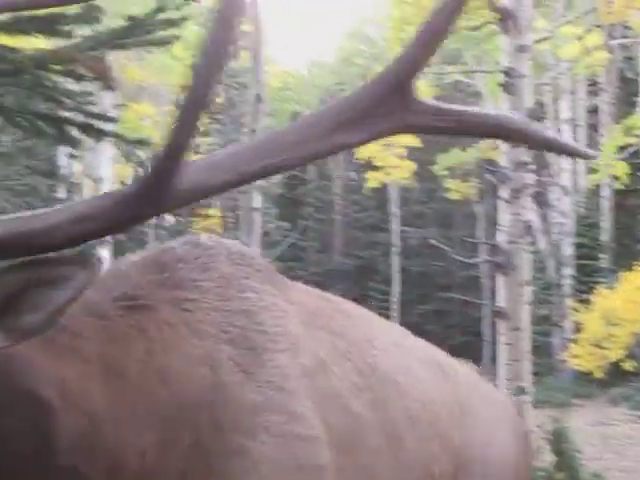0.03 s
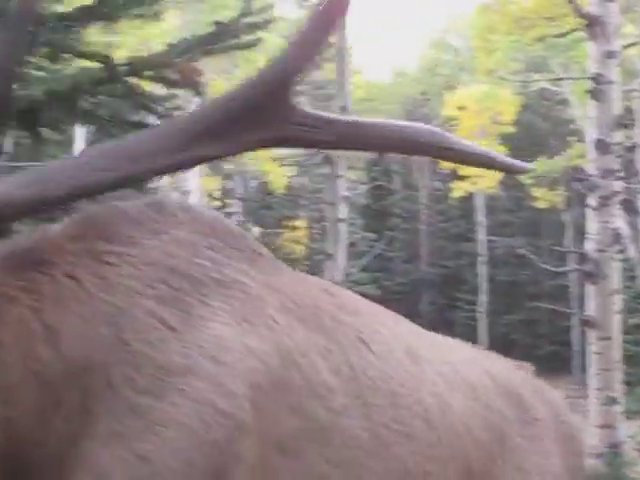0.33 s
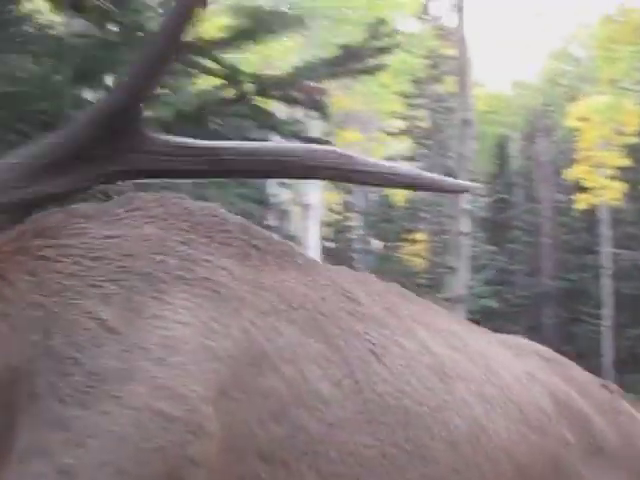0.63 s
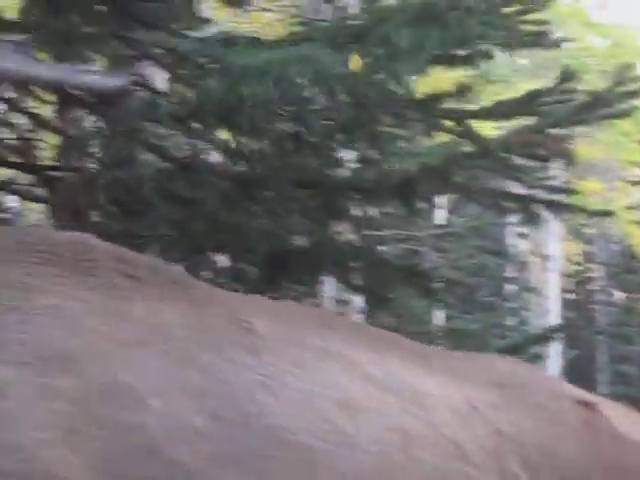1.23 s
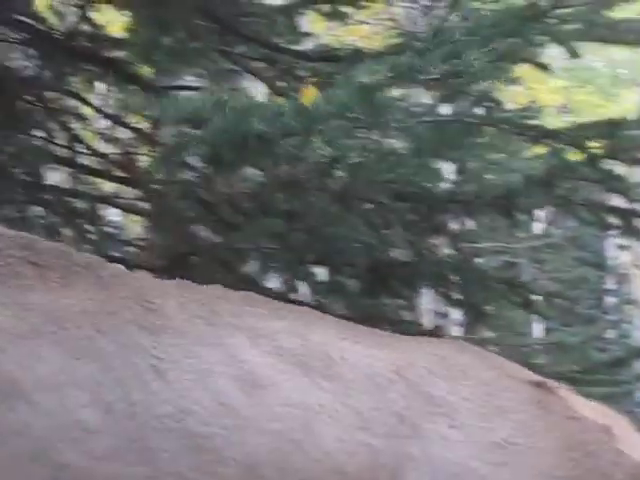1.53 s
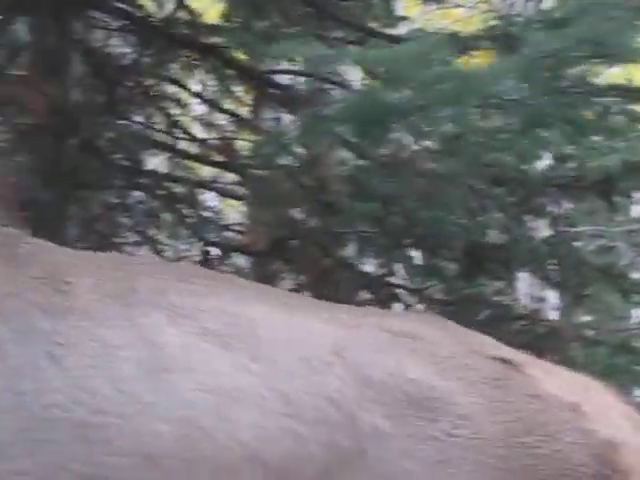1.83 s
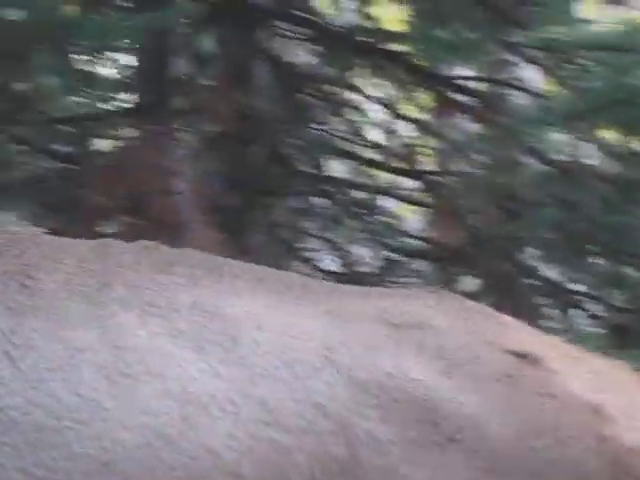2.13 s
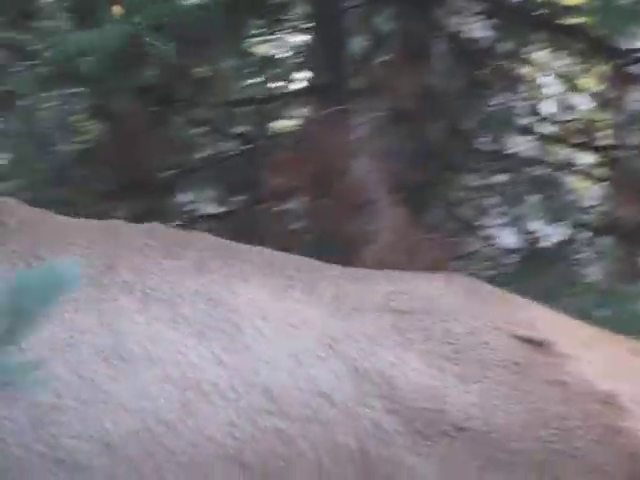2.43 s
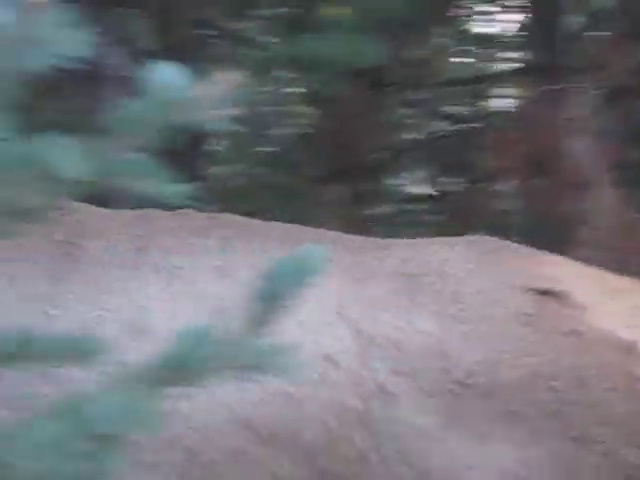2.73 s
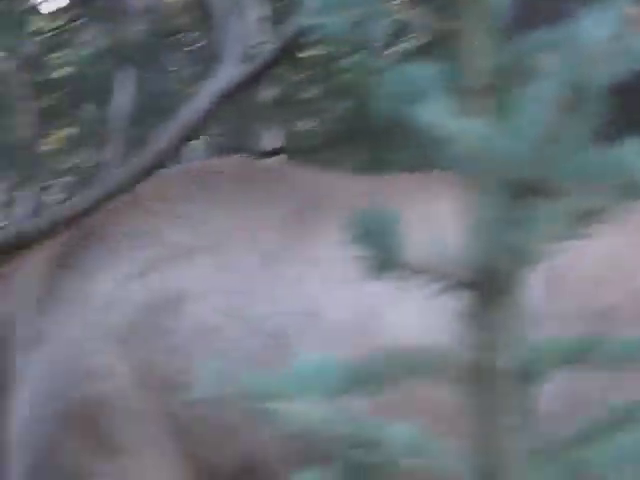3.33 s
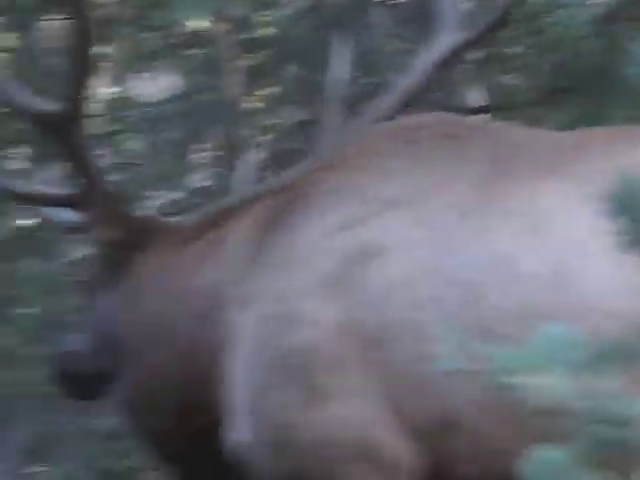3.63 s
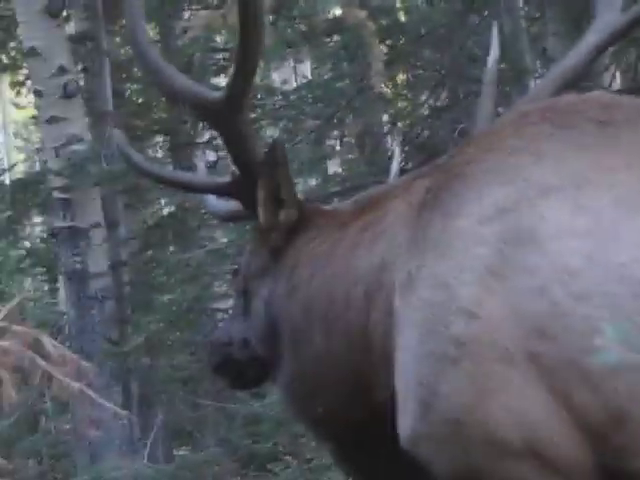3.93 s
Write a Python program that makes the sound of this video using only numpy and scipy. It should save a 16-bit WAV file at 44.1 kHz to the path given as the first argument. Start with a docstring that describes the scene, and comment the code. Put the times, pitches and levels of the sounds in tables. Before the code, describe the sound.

Soft hoof steps of a passing elk crackle through forest litter. Brushing boughs, small twig snaps and low wind buffeting on the microphone come first, then crunches and a few knocks on dead wood, growing quieter under a steady treetop hush.

```python
"""A large elk walks past through forest undergrowth, over the steady hush of the trees.
First, gusts buffet the two microphone ports as boughs swish along its flank and twigs snap.
From 0.9 s its hooves crunch dry litter, thud into soil and now and then knock on dead wood.
The wind surges again near 1.3 s. After 2 s it eases; swish and steps fade as the elk moves away."""
import sys
import numpy as np
from scipy import signal
from scipy.fft import rfft, irfft, next_fast_len
from scipy.io import wavfile
from scipy.ndimage import map_coordinates

SR = 44100
rng = np.random.default_rng(int(sys.argv[2]) if len(sys.argv) > 2 else 0)


def waveform_to_disk(signal):
    """Save audio, clipped to [-1, 1], as 16-bit WAV at the path in sys.argv[1]."""
    frames = np.transpose(np.atleast_2d(signal))
    scaled = np.clip(frames, -1, 1) * 32767
    samples = np.round(scaled).astype(np.int16)
    wavfile.write(sys.argv[1], SR, samples)


N = 176400

# Hooves on litter. Each row: peak time in seconds, level in dB, rise and fall over 20 dB in seconds,
# pitch in Hz, thud in dB relative to the crunch.
HOOF_STEPS = [(.865, -21, .023, 0.033, 4350, -6), (1.165, -35, .006, 0.019, 2940, -18),
              (1.184, -35.5, 0.01, 0.017, 4500, -1.5), (1.507, -41, 0.022, 0.041, 4080, -24),
              (1.619, -32.5, 0.028, 0.044, 4070, -18), (1.642, -34, 0.025, 0.015, 3680, -10),
              (2.303, -40.5, 0.018, 0.026, 2670, -24), (2.677, -38, 0.011, 0.04, 1500, 5),
              (2.696, -41.5, 0.042, 0.032, 5500, -15), (3.086, -44, 0.0065, 0.057, 4000, 0),
              (3.128, -37, 0.029, 0.028, 3080, 2.5), (3.275, -52, .03, 0.036, 8000, -17),
              (3.71, -38, 0.024, 0.032, 6000, -4), (3.75, -46, 0.013, 0.034, 2180, -12)]
# Breaking twigs. Each row: start in seconds, relative level in dB, pitch in Hz, width in octaves,
# T60 in seconds, left minus right in dB.
TWIG_SNAPS = [(.189, -24.5, 4170, 0.89, 0.023, 0), (0.195, -29.5, 3800, 0.62, 0.018, 2),
              (.383, -29.5, 4530, 1.2, 0.018, 1), (.5805, -21.5, 5100, 0.33, 0.006, 1),
              (0.637, -30, 4500, 0.47, .008, 3), (.727, -27, 8000, 1.6, 0.018, -2),
              (.978, -23, 4000, 0.56, 0.014, 0), (1.027, -26, 3380, 0.39, 0.016, 0),
              (1.186, -31, 5200, .9, 0.025, 4), (1.195, -27.5, 1600, 0.67, .009, .5),
              (1.222, -27, 14500, 0.27, 0.03, 4), (1.227, -24.5, 14500, 0.32, 0.028, -3),
              (1.6491, -17, 2500, 0.86, 0.016, 1), (1.699, -19.5, 7000, 1.9, 0.027, .5),
              (1.705, -22.5, 4700, 0.41, 0.024, 1), (1.805, -33, 4950, 0.31, 0.01, 2),
              (1.954, -33.5, 4170, 0.49, 0.026, 20), (1.964, -25, 4570, 0.65, 0.033, -3),
              (2.309, -34, 4000, 0.45, .01, 0), (2.474, -19, 4560, 0.66, 0.018, 4),
              (2.481, -28, 3500, 1.7, 0.11, -2), (2.874, -31, 6940, 0.4, 0.014, 2),
              (3.0476, -25, 4760, 1, 0.018, -.5), (3.112, -29, 5770, 0.8, 0.018, 1),
              (3.143, -36, 4000, 1.0, .01, 5), (3.707, -27.5, 6200, 0.76, 0.024, 6)]
# Hoof on dead wood. Each row: start in seconds, level in dB, pitch in Hz.
WOOD_KNOCKS = [(1.194, -27.5, 1120), (2.4735, -33, 1100), (2.676, -28.5, 1530), (2.683, -27.5, 1560),
               (2.853, -28, 892)]
# Dead wood resonances. Each row: ratio to the pitch, gain in dB.
KNOCK_MODES = [(0.99, -0.5), (0.58, -4.5)]
# Wind on the ports. Each row: time in seconds, strength in dB, left minus right in dB.
GUSTS = [(0.0, -14.5, 7), (0.04, -18, 6), (0.08, -27, -17.5), (0.11, -22, 4), (0.28, -18, -8),
         (0.37, -31.5, 11.5), (0.53, -23, 0.5), (0.61, -31.5, -12), (0.66, -31.5, 8), (0.97, -40, -6),
         (1.09, -24, 4.5), (1.12, -32, -0.5), (1.31, -17, 2), (1.47, -28, 10), (1.53, -40.5, 6),
         (1.69, -24, -12), (1.74, -28.5, -1), (1.95, -37, -9.5), (2.1, -50.5, 4.5), (2.34, -47.5, -10),
         (2.42, -38, -7.5), (2.58, -31, -11), (2.61, -38, -2.5), (2.75, -37, -12.5), (2.85, -39.5, 1),
         (2.9, -35, -11.5), (3.25, -41, -5), (3.39, -39.5, 12), (3.45, -44, -4), (3.55, -31, -4.5),
         (3.63, -46.5, 4), (3.72, -41.5, -11.5), (3.9, -28.5, -0.5), (4.0, -35.5, -17.5)]
# Single eddies. Each row: peak time in seconds, relative level in dB, Gaussian half length in seconds,
# pitch in Hz, left minus right in dB.
PORT_EDDIES = [(0.017, -18.5, 0.024, 104.8, 3), (.139, -16.5, 0.0063, 124.3, -6),
               (.236, -14.5, 0.012, 135.3, -12.5), (0.433, -26, 0.011, 114, 11),
               (0.518, -23.5, 0.0065, 125.1, 19.5), (1.3, -17, 0.027, 110, 0), (1.365, -14, 0.038, 99.9, 8),
               (1.456, -18.5, 0.011, 79.6, 19.5), (1.576, -38, .025, 35, -3), (1.689, -25, 0.028, 54.9, -5),
               (1.799, -24, 0.026, 41.9, -3.5), (2.566, -35, 0.017, 70.5, -17),
               (2.918, -29, 0.0094, 44.7, -22)]

# Level curves of boughs and treetops. Each row: time in seconds, level in dB.
BOUGH_LEVELS = [(0, -35.5), (.03, -38), (.16, -46), (.3, -43), (.41, -42.5), (.44, -37.5), (.48, -41.5),
                (.6, -39.5), (.82, -43), (.91, -34), (1.05, -41), (1.2, -39.5), (1.45, -51), (1.58, -49.5),
                (1.72, -42.5), (1.81, -45.5), (1.89, -37), (1.995, -43), (2.025, -50), (2.3, -49.5),
                (2.6, -52.5), (3.1, -51), (3.5, -57), (4, -56.5)]
TREETOP_LEVELS = [(0, -46.5), (.9, -43.5), (1.5, -43.5), (2.3, -43), (3.2, -45), (4, -45)]

# Source spectra. Each row: frequency in Hz, relative spectral density in dB.
THUD_SPECTRUM = [(30, -10), (120, -2.5), (330, -7.5), (420, -10), (600, -24), (1500, -35), (4000, -80)]
SLIDE_SPECTRUM = [(200, -15), (700, -4.5), (1500, -3.5), (3000, 0), (5000, -1), (7200, -3.5), (8200, -5),
                  (12000, -10), (16000, -14.5)]
TICK_SPECTRUM = [(500, -33), (2000, -1), (4500, 12), (7000, -3.5), (12000, -6), (16000, -4)]
RUMBLE_SPECTRUM = [(10, -10), (22, 1), (35, -1.5), (60, -4.5), (90, -7), (140, -23), (300, -44.5),
                   (700, -49), (2000, -120)]
FLUTTER_SPECTRUM = [(30, -14), (85, 2), (150, 5), (230, -11.5), (330, -20), (500, -42.5), (1000, -74),
                    (3000, -120)]
TREETOP_SPECTRUM = [(100, -22), (200, -5), (400, -4), (700, -5), (1200, -7), (2000, -8), (3200, -8.5),
                    (5000, -12.5), (6500, -21), (8000, -25.5), (11500, -40), (16000, -70)]

# Likeness of left and right. Each row: frequency in Hz, correlation.
NEAR_COHERENCE = [(200, 1), (2000, 0.9), (4000, 0.79), (8000, 0.48), (14000, 0.61)]
WIDE_COHERENCE = [(100, 1), (500, 0.95), (1000, 0.84), (2000, 0.56), (4000, 0.22), (8000, 0.39),
                  (14000, 0.67)]
# Decay among the trunks. Each row: frequency in Hz, T60 in seconds.
TRUNK_DECAY = [(200, 0.14), (2000, 0.41), (12000, 0.25)]
# Microphone response. Each row: frequency in Hz, gain in dB.
MIC_RESPONSE = [(5, -30), (12, -20), (20, 1), (7000, -0.5), (8500, -2.5), (12500, -1.5), (14500, -5.5),
                (16000, -9)]


def hoof_steps():
    """A hoof crushes litter in a swell of grains; its weight thuds into the soil just after."""
    thud_delay_s, thud_half_s = 0.0069, 0.0066
    out, lead = np.zeros((2, N)), SR // 10
    t = (np.arange(SR // 3) - lead) / SR
    for peak_s, db, rise_s, fall_s, hz, thud_db in HOOF_STEPS:
        grains = crackle(len(t), per_s=7000, spread_db=3)
        crunch = stereo(grains, hump(hz, octaves=0.76, skirt_db=-13), NEAR_COHERENCE)
        crunch *= amp(-20 * np.maximum(-t / rise_s, t / fall_s) ** 1.71)
        thud = stereo(noise(len(t)), log_curve(THUD_SPECTRUM), NEAR_COHERENCE)
        thud *= bell(t - thud_delay_s, thud_half_s)
        add(out, peak_s - lead / SR, amp(db) * (crunch + amp(thud_db) * thud))
    return out


def twig_snaps():
    """A twig breaks with one sharp crack and brief splintering."""
    out, lead = np.zeros((2, N)), SR // 500
    t = np.arange(SR // 16) / SR
    for start_s, db, hz, octaves, t60_s, pan_db in TWIG_SNAPS:
        splinters = crackle(len(t), per_s=15000, spread_db=6) * amp(-60 * t / t60_s)
        splinters[0, 0] += 4  # first crack
        splinters = np.pad(splinters, ((0, 0), (lead, 0)))
        snap = stereo(splinters, hump(hz, octaves, skirt_db=-48), NEAR_COHERENCE)
        add(out, start_s - lead / SR, snap * amp(db - 18 + split_db(pan_db)))
    return out


def wood_knocks():
    """Dead wood answers a hoof with a brief, rough ring."""
    attack_s, t60_s = 0.0005, 0.022
    out, t = np.zeros((2, N)), np.arange(SR // 12) / SR
    attack = 1 - np.exp(-t / attack_s)
    for start_s, db, hz in WOOD_KNOCKS:
        for ratio, mode_db in KNOCK_MODES:
            ring = stereo(noise(len(t)), hump(ratio * hz, octaves=0.14, skirt_db=-28), NEAR_COHERENCE)
            add(out, start_s, ring * attack * amp(db + mode_db - 60 * t / t60_s))
    return out


def bough_swish():
    """Needles and leaves slide over the coat in a fine crackle; a few catch and tick."""
    level_db, = time_curves(BOUGH_LEVELS)
    slide = stereo(crackle(N, per_s=4000, spread_db=0.5), log_curve(SLIDE_SPECTRUM), WIDE_COHERENCE)
    ticks = stereo(crackle(N, per_s=110, spread_db=4.5), log_curve(TICK_SPECTRUM), NEAR_COHERENCE)
    return amp(level_db + wobble(39.84)) * (slide + amp(-10) * ticks)


def wind_buffet():
    """Gusts hit each port separately; flutter grows faster than rumble with their strength."""
    strong_gust_db, flutter_at_strong_db, flutter_slope = -17.5, -27, 1.63
    strength_db, pan_db = time_curves(GUSTS)
    port_db = strength_db + split_db(pan_db) + 0.5 * np.array([wobble(20), wobble(18)])
    rumble = stereo(noise(N), log_curve(RUMBLE_SPECTRUM), coherence=[(50, 0.072)])
    flutter = stereo(noise(N), log_curve(FLUTTER_SPECTRUM), coherence=[(50, 0.055)])
    lumps_db = 3 * np.array([wobble(45), wobble(45)])
    flutter_db = flutter_at_strong_db + flutter_slope * (port_db - strong_gust_db) + lumps_db
    return rumble * amp(port_db + 1.98) + flutter * amp(flutter_db)


def eddy_thumps():
    """An eddy crossing a port gives one rolling push of pressure, with turbulence churning inside."""
    churn_ratio, churn_octaves, churn_db = 1.173, 0.77, -5
    out, lead = np.zeros((2, N)), SR // 8
    t = (np.arange(2 * lead) - lead) / SR
    for peak_s, db, half_s, hz, pan_db in PORT_EDDIES:
        churn_hz = churn_ratio * hz
        colour_db = lambda f: -10 / np.log(10) * (np.log2((f + 1) / churn_hz) / churn_octaves) ** 2
        churn = stereo(noise(len(t)), colour_db, coherence=[(50, 0.1)])
        roll_hz = hz * np.exp(0.22 * wobble(120.4)[:len(t)])
        cycles = np.cumsum(roll_hz) / SR + rng.random((2, 1))
        roll = np.sqrt(2) * np.sin(2 * np.pi * cycles)
        push = (roll + amp(churn_db) * churn) * bell(t, half_s)
        add(out, peak_s - lead / SR, push * amp(db - 5 + split_db(pan_db)))
    return out


def trunk_scatter(sound):
    """Trunks scatter a sound into a short tail."""
    hz, t, spectra = signal.stft(noise(SR // 2), SR, nperseg=256)
    t60_s = log_curve(TRUNK_DECAY)(hz)[:, None]
    _, tail = signal.istft(spectra * amp(-60 * t / t60_s), SR, nperseg=256)
    return signal.fftconvolve(sound, tail / np.linalg.norm(tail[0]), axes=1)[:, :N]


def treetop_hush():
    """Distant treetops give a steady hush."""
    level_db, = time_curves(TREETOP_LEVELS)
    return amp(level_db) * stereo(noise(N), log_curve(TREETOP_SPECTRUM), WIDE_COHERENCE)


def amp(db):
    """Decibels to gain."""
    return 10 ** (np.asarray(db) / 20)


def split_db(pan_db):
    """Left and right offsets for a level difference."""
    return np.vstack([pan_db, -pan_db]) / 2


def unit_rms(x):
    """Scaled to rms 1."""
    return x / np.sqrt(np.mean(x ** 2) + 1e-20)


def bell(x, sigma):
    """Gaussian, peak 1."""
    return np.exp(-0.5 * (x / sigma) ** 2)


def log_curve(rows):
    """Function of Hz through the rows, on a log axis."""
    knots_hz, values = np.transpose(rows)
    return lambda hz: np.interp(np.log(hz + 1), np.log(knots_hz + 1), values)


def time_curves(rows):
    """One value per sample for each column after the time."""
    times_s, *columns = np.transpose(rows)
    return [np.interp(np.arange(N) / SR, times_s, column) for column in columns]


def noise(size):
    """Two streams of white noise."""
    return rng.standard_normal((2, size))


def wobble(knots_per_s):
    """Smooth random curve."""
    knots = rng.standard_normal(int(N * knots_per_s / SR) + 4)
    return map_coordinates(knots, [np.arange(N) * knots_per_s / SR])


def crackle(size, per_s, spread_db):
    """Two streams of tiny fractures of uneven strength."""
    hits = rng.random((2, size)) < per_s / SR
    signs = rng.choice([-1, 1], (2, size))
    return unit_rms(hits * signs * amp(spread_db * np.clip(noise(size), -2, 2)))


def hump(centre_hz, octaves, skirt_db):
    """Spectrum of a resonance over a skirt that fades in the treble; deep bass cut."""
    def colour_db(hz):
        peak = bell(np.log2((hz + 1) / centre_hz), octaves)
        skirt = amp(skirt_db) ** 2 / (1 + (hz / (3 * centre_hz)) ** 2) / (1 + (centre_hz / 6000) ** 4)
        return 10 * np.log10((peak + skirt) / (1 + (100 / (hz + 1)) ** 4))
    return colour_db


def filtered(x, response):
    """Applies a gain given as a function of Hz."""
    size = x.shape[-1]
    padded = next_fast_len(size + 4096)
    return irfft(rfft(x, padded) * response(np.fft.rfftfreq(padded, 1 / SR)), padded)[..., :size]


def stereo(pair, colour_db, coherence):
    """Two unrelated streams coloured and blended into left and right, rms 1."""
    def response(hz):
        angle = np.arccos(np.clip(log_curve(coherence)(hz), -1, 1)) / 2
        return amp(colour_db(hz)) * [np.cos(angle), np.sin(angle)]
    mid, side = filtered(pair, response)
    return unit_rms(np.array([mid + side, mid - side]))


def add(track, start_s, sound):
    """Mixes a sound in, cropped to the track."""
    start = round(start_s * SR)
    sound = sound[:, max(-start, 0):]
    start = max(start, 0)
    track[:, start:start + sound.shape[1]] += sound[:, :max(N - start, 0)]


def scene():
    """The walking elk among the trees, with wind."""
    hooves = hoof_steps() + twig_snaps() + wood_knocks()
    elk = hooves + amp(-17) * trunk_scatter(hooves) + bough_swish()
    return elk + treetop_hush() + wind_buffet() + eddy_thumps()


def record(dry):
    """The microphone sheds the deepest bass and cuts off at its band limit."""
    limit_hz = 16000
    return filtered(dry, lambda hz: amp(log_curve(MIC_RESPONSE)(hz)) * (hz < limit_hz))


dry = scene()
out = record(dry)
waveform_to_disk(out)
```